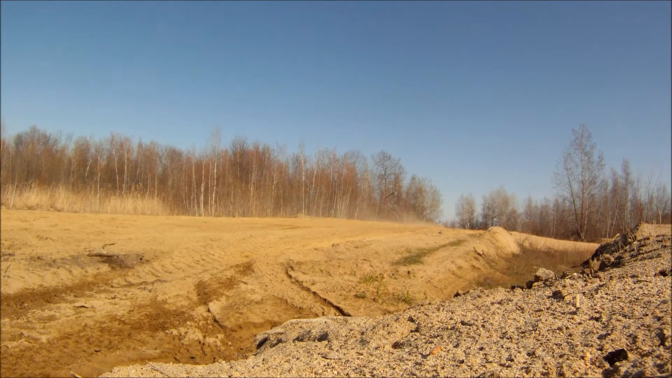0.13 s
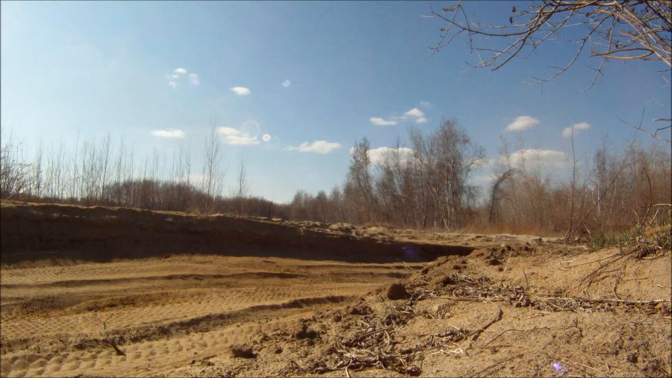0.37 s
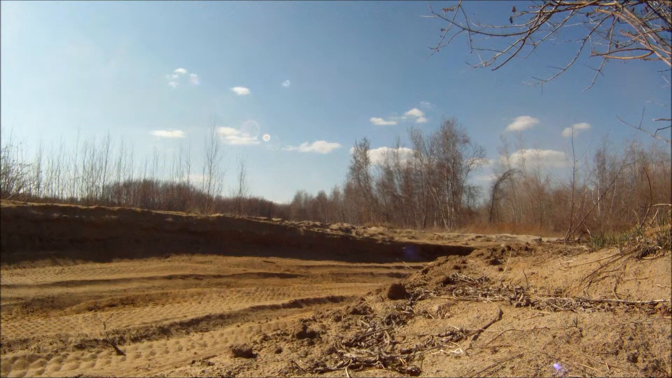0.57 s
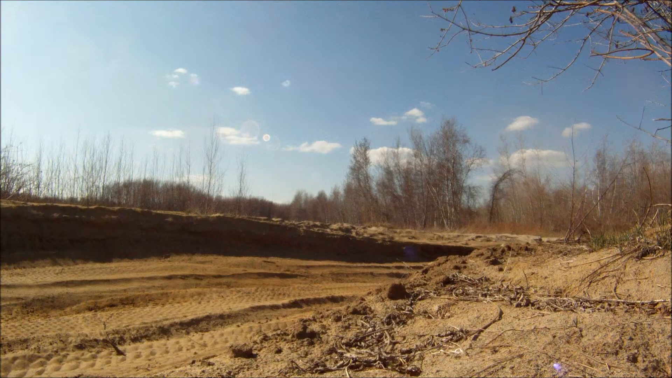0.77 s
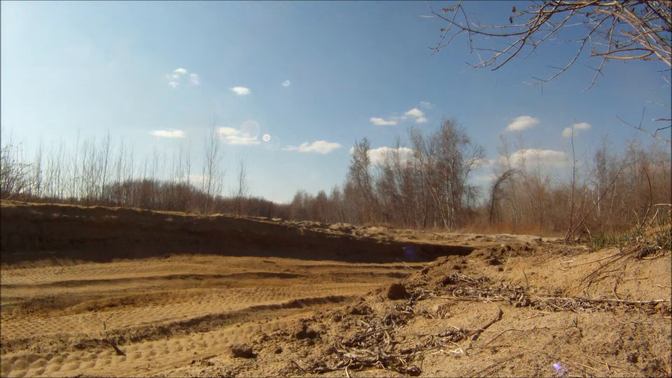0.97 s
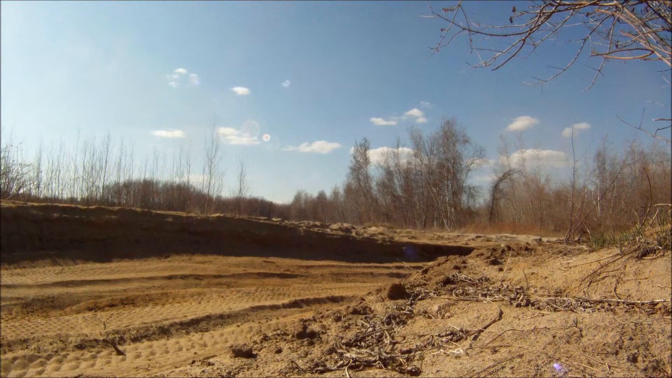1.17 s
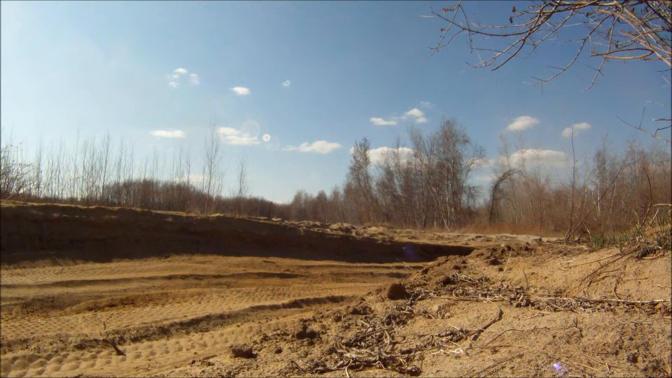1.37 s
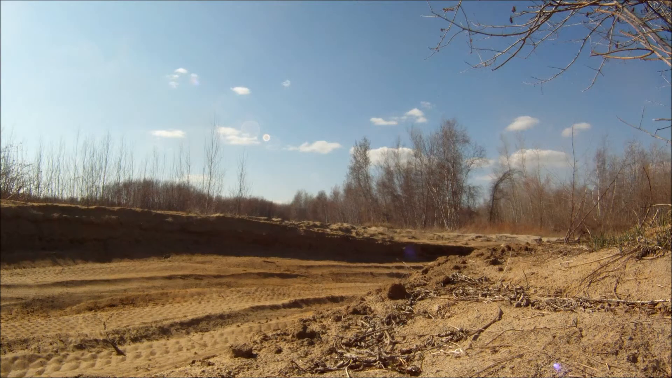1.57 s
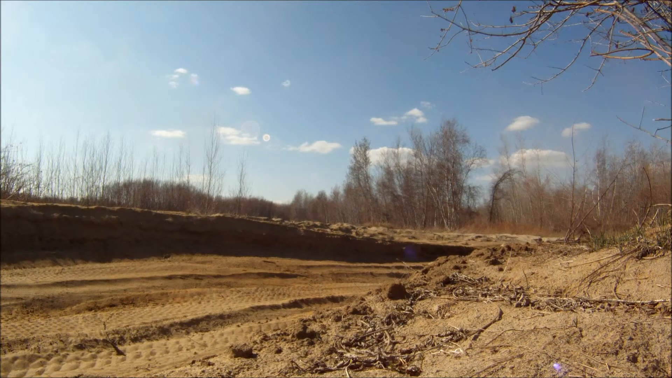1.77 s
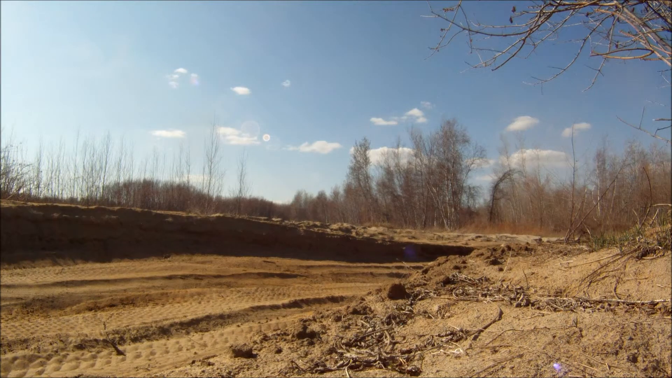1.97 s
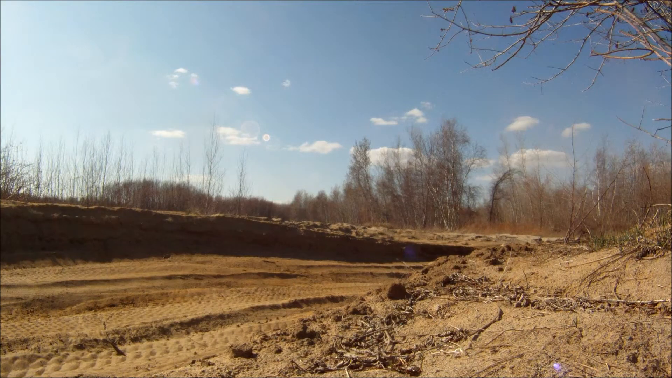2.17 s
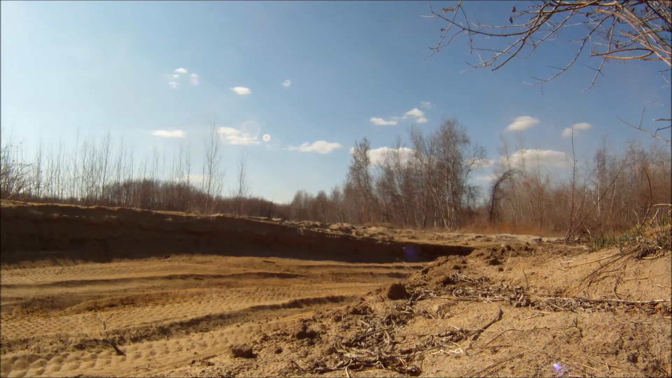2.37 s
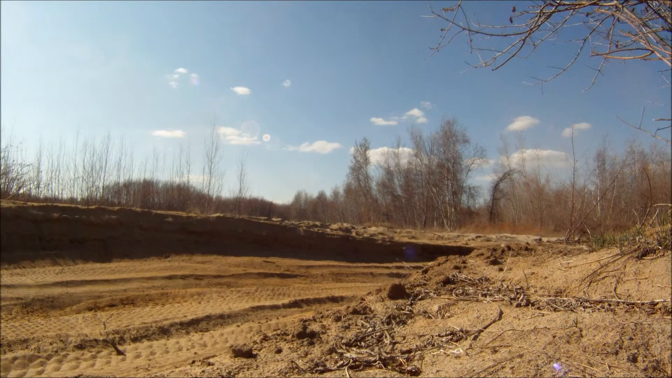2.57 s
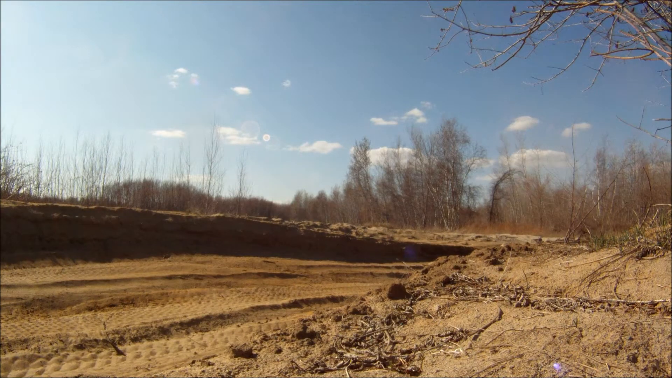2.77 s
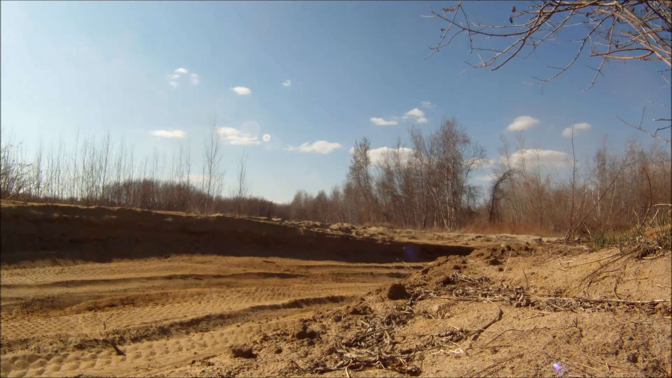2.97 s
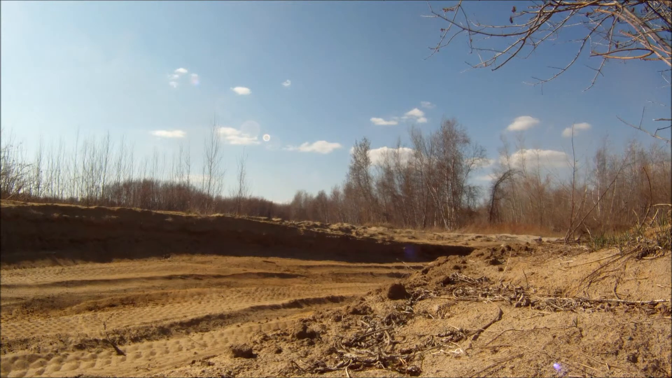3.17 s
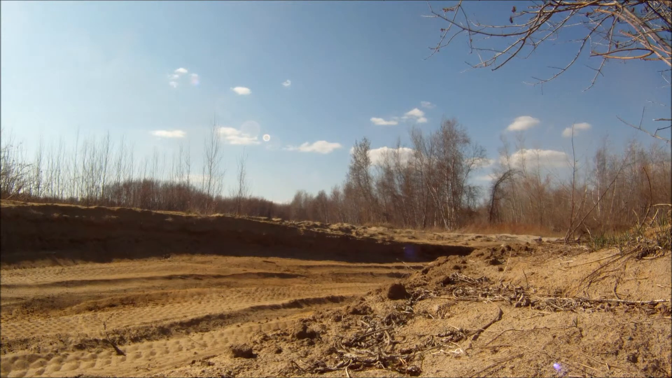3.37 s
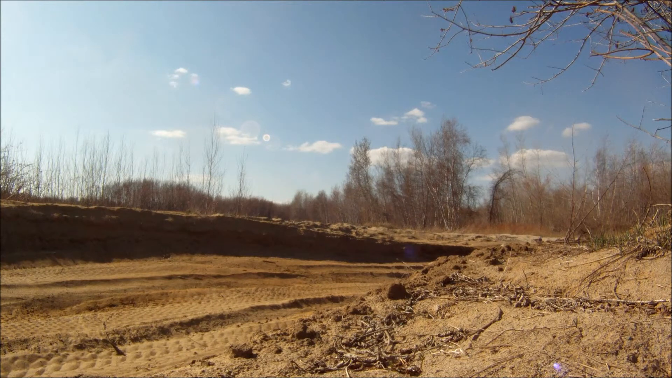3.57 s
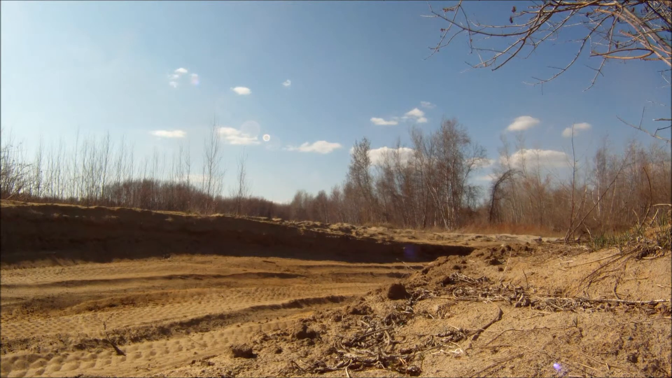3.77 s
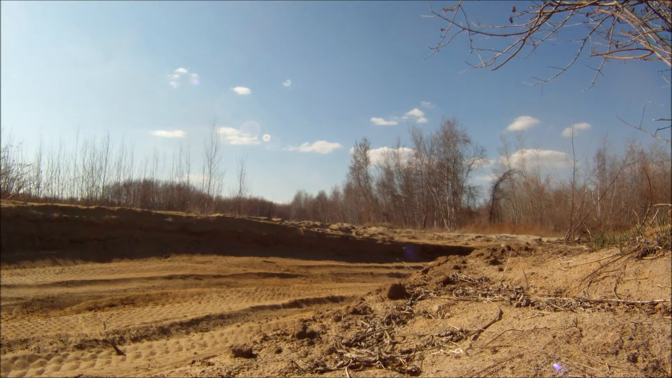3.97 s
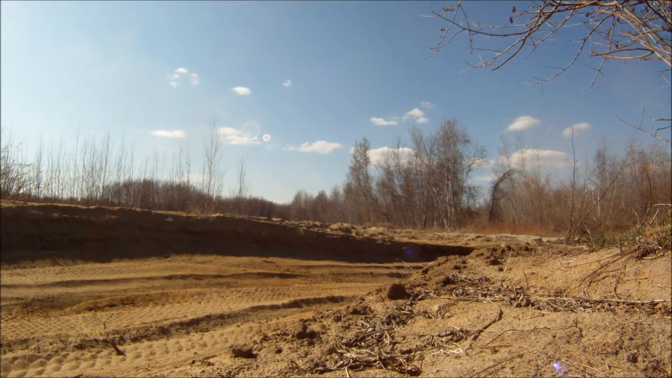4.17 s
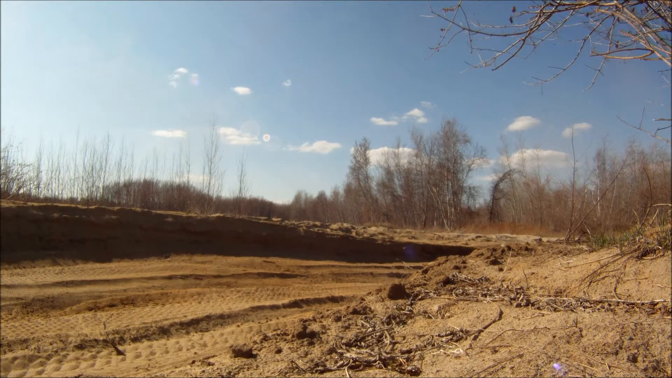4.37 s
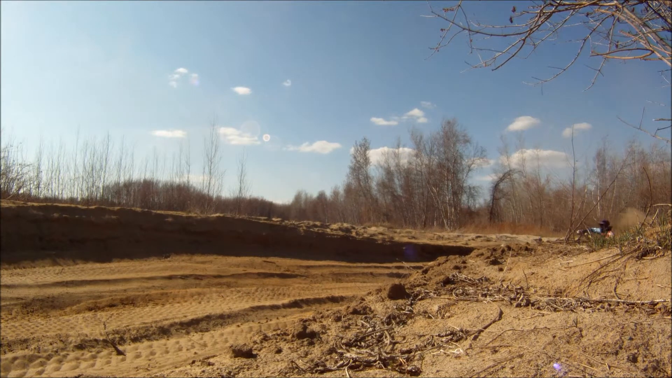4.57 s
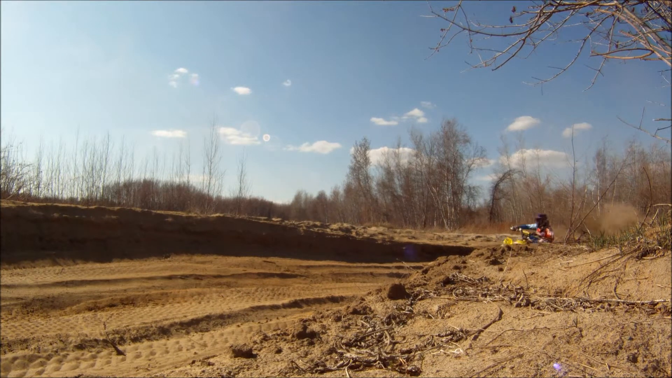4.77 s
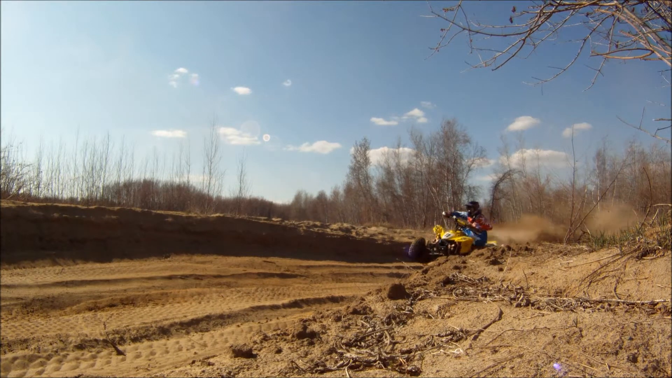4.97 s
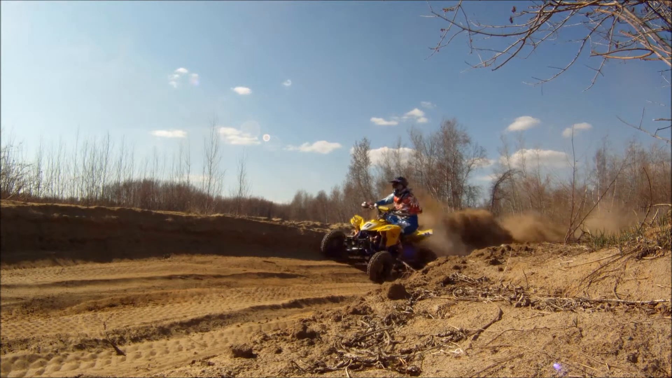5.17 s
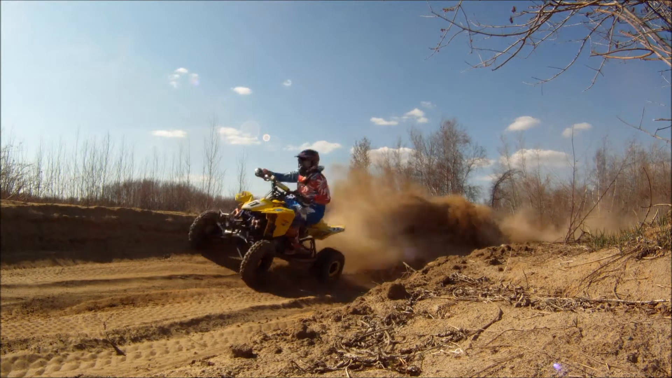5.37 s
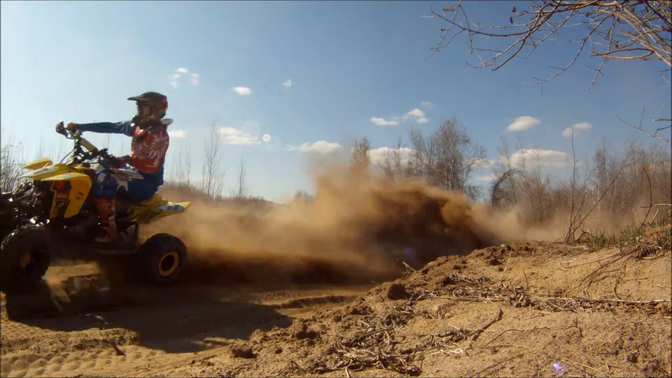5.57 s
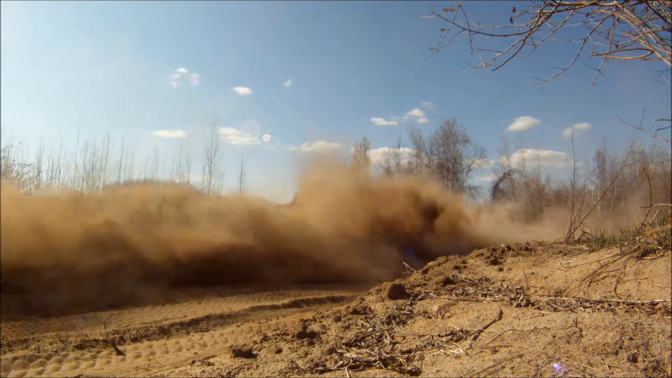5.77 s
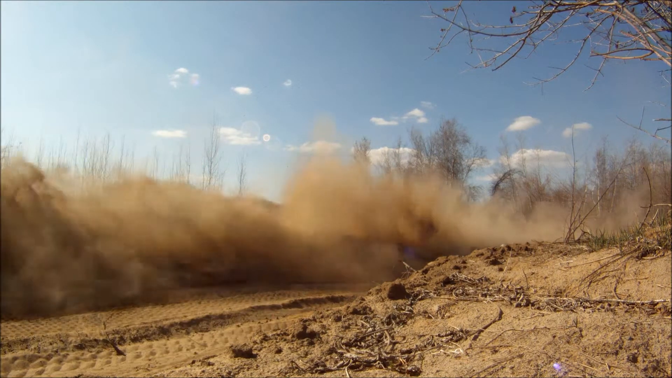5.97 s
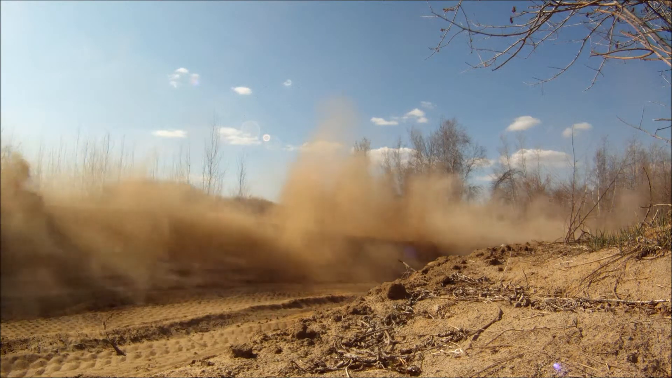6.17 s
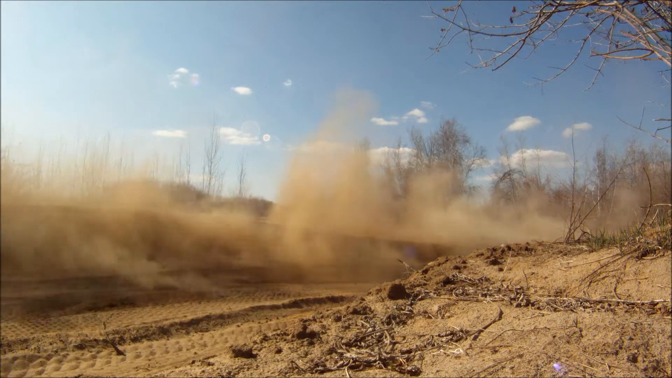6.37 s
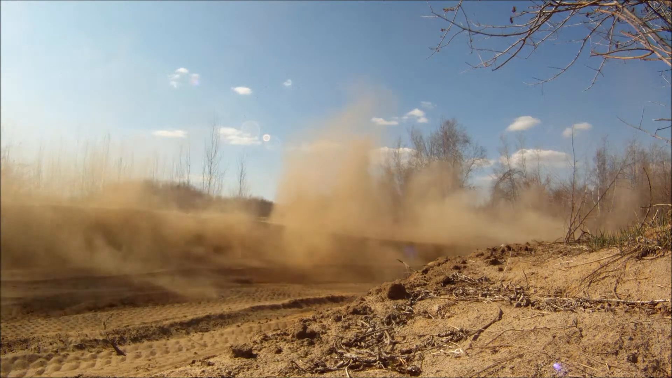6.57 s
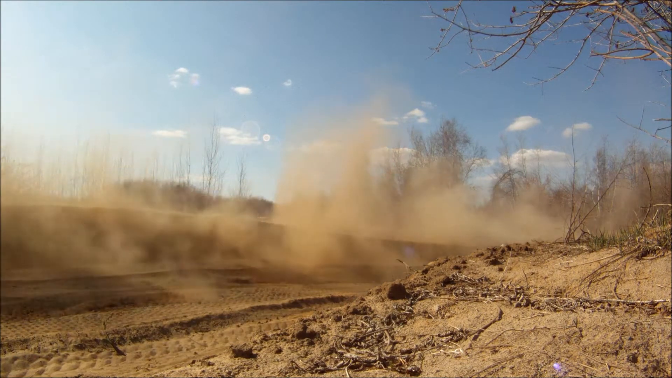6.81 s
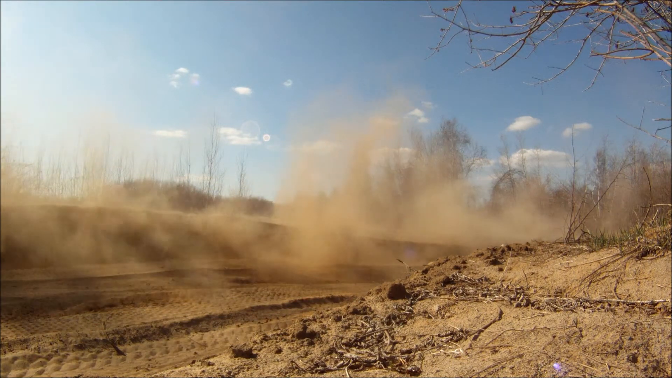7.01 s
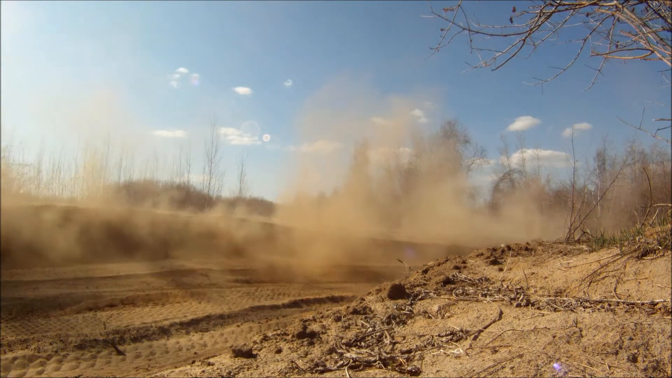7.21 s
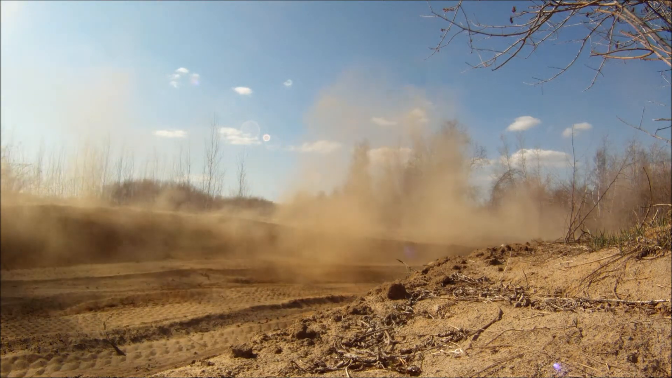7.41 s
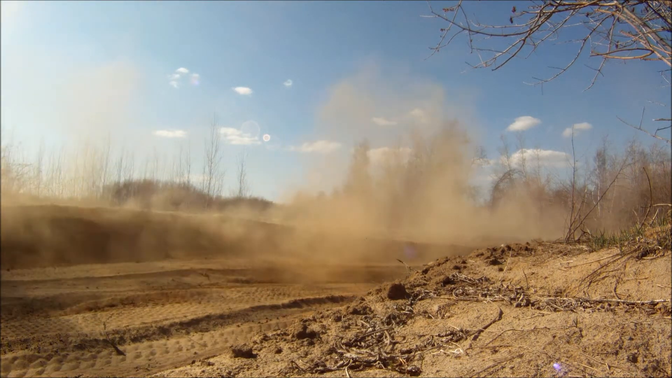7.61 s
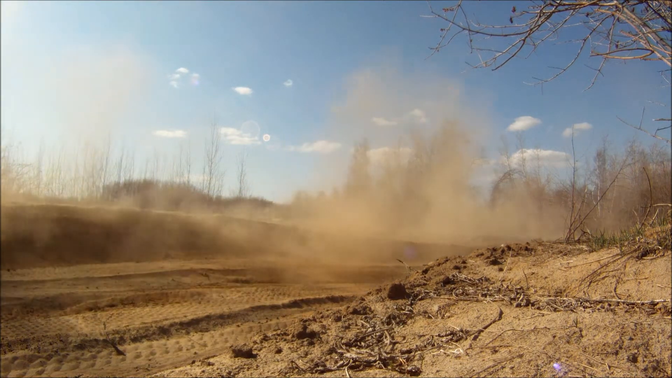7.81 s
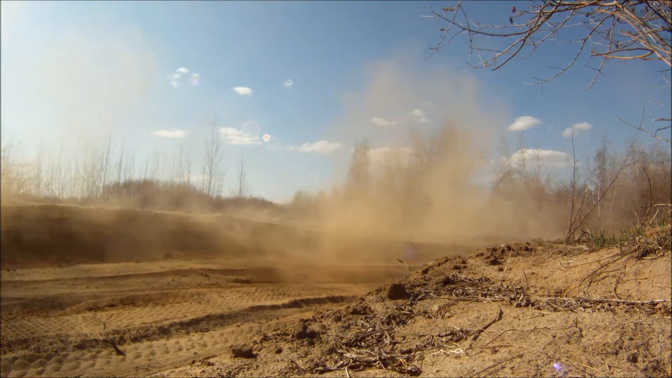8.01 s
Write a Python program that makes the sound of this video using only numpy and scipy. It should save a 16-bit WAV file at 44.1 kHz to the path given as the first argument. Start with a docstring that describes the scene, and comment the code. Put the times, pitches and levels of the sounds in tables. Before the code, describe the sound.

A quad bike's single-cylinder engine, close and dry with no audible room. From 0 to 0.28 s it coasts, muffled and falling in pitch; then it jumps abruptly louder and higher, with bright clatter and gas. Until 1.6 s the revs waver upward in uneven surges, then drop. A brief blip at 1.8 s gives way to a soft, slightly hunting low idle from about 2 to 3.3 s. Throttle blips at 3.4, 3.7 and 3.9 s bring back deep boom and growl. From 4.5 s it pulls steadily, brighter, with a nasal buzz near 5.5 s. Around 5.9 to 6.7 s it is wide open: a hard, crackling, hissing rasp dominates. At 6.85 s the sound cuts back briefly; at 6.93 s the next gear bites with a low thump, and pitch falls. It then lugs on, growling and uneven, nasal buzz returning until the end at 8 s.

```python
"""A single-cylinder four-stroke quad bike is ridden over sand, the microphone close by on the machine. The
sound jumps at .28 s to a louder, faster stretch; the rider then revs, coasts, idles, blips, pulls up to full
throttle and changes gear. Each firing sends one pulse down the pipe: harmonics of the firing rate, shaped by
the way of riding and by speed. Filtered noise adds a rumble, the clatter of valves and chain, a nasal buzz on
each firing, and a rasp of gas that is most of the treble with the throttle wide."""
import sys
import numpy as np
from scipy import signal
from scipy.fft import irfft
from scipy.io import wavfile

SR = 44100
rng = np.random.default_rng(int(sys.argv[2]) if len(sys.argv) > 2 else 0)


def bounce(signal):
    """Save signal as a 16-bit WAV file at the path given by the first command-line argument."""
    frames = np.transpose(np.atleast_2d(signal))
    limited = np.clip(frames, -1, 1)
    pcm = np.round(limited * 32767).astype(np.int16)
    wavfile.write(sys.argv[1], SR, pcm)


N = 354992
TIME = np.arange(N) / SR
STEP = 64  # samples between updates of the slow controls
SLOW_TIME = TIME[::STEP]
WAVER_DB, WAVER_PER_S = 0.79, 11  # boom, growl, bark and treble each waver a little


def gain_of(db):
    """Decibels to amplitude."""
    return 10 ** (np.asarray(db) / 20)


def evened(x):
    """Scales to rms 1."""
    return x / np.sqrt(np.mean(x ** 2) + 1e-20)


def curve(rows, t=TIME):
    """The second column of a table, joined by straight lines in time."""
    start_s, values = np.transpose(rows)
    return np.interp(t, start_s, values)


def coloured(x, points):
    """Minimum-phase filter with the given outline of freq_hz and level_db."""
    freq_hz, level_db = np.transpose(points)
    bins_hz = abs(np.fft.fftfreq(4096, 1 / SR)) + 1
    log_gain = np.log(gain_of(np.interp(np.log(bins_hz), np.log(freq_hz), level_db)))
    # the phase that goes with this outline in a causal filter
    taps = np.fft.ifft(np.exp(np.conj(signal.hilbert(log_gain)))).real
    return signal.oaconvolve(x, taps[:len(taps) // 2])[:N]


def random_glide(count):
    """One random value for each whole count, gliding from one to the next."""
    values = rng.standard_normal(1000)
    return np.interp(count, np.arange(len(values)), values)


# Engine speed before hunting and jitter: start_s, firing_hz (firings a second)
ENGINE_SPEED = [(0.0, 52.1), (0.16, 44.4), (0.27, 44.2), (0.29, 63.8), (0.57, 68.5), (0.71, 63.6),
                (0.93, 77.9), (1.03, 67.5), (1.14, 75.1), (1.24, 66.1), (1.3, 75.2), (1.4, 78.7),
                (1.46, 72.4), (1.56, 84.5), (1.62, 75.2), (1.64, 57.9), (1.76, 53.0), (1.79, 62.0),
                (1.84, 63.7), (1.89, 56.8), (1.99, 50.6), (2.29, 50.3), (2.42, 46.0), (2.48, 49.5),
                (2.63, 44.4), (2.68, 49.4), (2.87, 48.2), (3.38, 48.4), (3.44, 55.5), (3.54, 62.2),
                (3.65, 55.8), (3.74, 59.9), (3.85, 59.2), (3.93, 52.9), (4.09, 55.4), (4.18, 60.0),
                (4.27, 56.4), (4.38, 66.2), (4.48, 57.9), (4.6, 64.1), (4.78, 65.6), (4.99, 62.9),
                (5.14, 73.9), (5.19, 74.5), (5.29, 66.7), (5.46, 63.3), (5.55, 67.7), (5.8, 71.9),
                (5.94, 65.8), (6.19, 72.1), (6.27, 65.4), (6.44, 65.1), (6.53, 69.3), (6.73, 67.4),
                (6.77, 68.8), (6.83, 78.4), (6.93, 75.0), (6.98, 81.4), (7.01, 78.5), (7.05, 69.0),
                (7.18, 56.0), (7.36, 62.3), (7.46, 57.8), (7.55, 67.2), (7.66, 59.4), (7.69, 63.4),
                (7.76, 64.4), (7.83, 58.4), (8.04, 63.1)]


def firing_rate(t=TIME):
    """Firings a second; a four-stroke single fires once in two turns of the crank."""
    return curve(ENGINE_SPEED, t)


# Harmonic outline of the exhaust pulse for each way of riding, before the boom, growl and bark are set:
# order (multiple of the firing rate), level_db
COAST = [(1, -8.5), (2, -9), (3, 3.5), (4, -5.5), (5, -18), (6, -23.5), (7, -17.5), (8, -20.5), (9, -45.5),
         (10, -28), (11, -34), (12, -34), (14, -46.5), (17, -54), (20, -53), (24, -52)]
IDLE = [(1, -4.5), (2, 3), (3, -11), (4, -8.5), (5, -9), (6, -15.5), (7, -21.5), (8, -19.5), (9, -17.5),
        (10, -22), (11, -52), (12, -27), (14, -36), (17, -58), (20, -45), (24, -47)]
CRUISE = [(1, -9.5), (2, 9.5), (3, 0.5), (4, -5.5), (5, -15.5), (6, -22), (7, -25.5), (8, -29.5),
          (9, -21.5), (10, -57), (11, -35), (12, -59), (14, -49), (17, -34), (20, -51), (24, -54)]
PULL = [(1, 11), (2, 18), (3, 14.5), (4, 3.5), (5, -2), (6, -4.5), (7, -56.5), (8, -11), (9, -22),
        (10, -21.5), (11, -24), (12, -20.5), (14, -26.5), (17, -37.5), (20, -48), (24, -56)]
CHARGE = [(1, 10), (2, 25), (3, 13.5), (4, 16.5), (5, 10.5), (6, -3), (7, 3), (8, -13), (9, -3.5), (10, -4),
          (11, -13), (12, -9), (14, -12.5), (17, -23), (20, -24), (24, -30)]
BUILD = [(1, -22.5), (2, 1), (3, 5), (4, 1), (5, 2), (6, -16), (7, -10), (8, -14.5), (9, -14.5),
         (10, -25.5), (11, -14.5), (12, -19), (14, -14.5), (17, -25.5), (20, -31), (24, -37)]
FLAT_OUT = [(1, -6), (2, 4.5), (3, 2.5), (4, 3.5), (5, 3.5), (6, -4), (7, 4), (8, 1.5), (9, -2), (10, -6),
            (11, -11.5), (12, -14), (14, -15), (17, -42), (20, -23), (24, -29)]
LUG = [(1, 2), (2, 11), (3, 11.5), (4, 4), (5, 9.5), (6, 8.5), (7, 1.5), (8, 0), (9, -4.5), (10, -5.5),
       (11, -11), (12, -14), (14, -17), (17, -37), (20, -47), (24, -39)]
# Settings over time: a sudden jump at .28 s, then moves of the throttle; levels are those before speed and
# waver bend them: start_s (middle of the change), change_s, pulse, boom_db, growl_db, bark_db, ringing (of the
# pipe, 0-1), uneven_db (from firing to firing)
RIDE = [ (0, .01, COAST, -31, -34, -47.5, 0.46, .5), (.28, .02, CRUISE, -23, -34.5, -49.5, 0.72, 1),
        (1, 0.87, CRUISE, -24.5, -31.5, -43.5, 0.8, 2), (1.613, 0.017, COAST, -32, -41, -53.5, 0.9, 2),
        (1.772, .02, PULL, -29, -36.5, -48.5, 1, 2), (1.85, 0.023, COAST, -32, -40, -50, 0.81, 1.7),
        (2.641, 0.014, IDLE, -33.5, -43, -51, 0.9, 2), (3.1, 0.27, IDLE, -31.5, -36.5, -43.5, 1, 1.5),
        (3.385, .088, PULL, -22.5, -30, -43.5, 1, 1.2), (3.59, 0.072, IDLE, -28.5, -38, -45, 1, 2),
        (3.67, .05, PULL, -22, -26, -44, 1, 2), (3.805, 0.061, IDLE, -26.5, -39, -42, 1, 0.6),
        (3.92, 0.058, PULL, -22, -24.5, -42.5, 0.97, 1.58), (4.4, 0.057, PULL, -21.5, -26, -38, 1, 1.94),
        (4.56, 0.082, BUILD, -21, -26.5, -39.5, 0.88, 0.67), (5.15, 0.41, BUILD, -22, -26, -36.5, 1, 0.86),
        (5.5, 0.17, CHARGE, -23, -25, -35.5, 1, 0.9), (5.87, .16, FLAT_OUT, -26.5, -29.5, -35.5, .08, .85),
        (6.839, 0.023, FLAT_OUT, -34, -41, -47, 0.2, 3.5), (6.925, .02, LUG, -27.7, -27.3, -30, .58, .9), ]


def ridden(t, settings):
    """Glides from one setting to the next, one for each row of RIDE."""
    state = settings[0]
    for (start_s, change_s, *_), goal in zip(RIDE[1:], settings[1:]):
        progress = np.clip((t - start_s) / change_s + .5, 0, 1)
        state = state + progress * (goal - state)
    return state


WIDE_S = 5.85  # middle of the change as the throttle reaches its stop


def wide_open(t, change_s=0.34):
    """Goes from 0 to 1 as the throttle reaches its stop."""
    return np.clip((t - WIDE_S) / change_s + .5, 0, 1)


# Bend per octave of engine speed above MID_RATE (firings a second)
MID_RATE = 60
BOOM_DB_PER_OCTAVE, GROWL_DB_PER_OCTAVE, BARK_DB_PER_OCTAVE = -3, 11.5, -1
BARK_SHARE, MID_TREBLE_DB = .45, -50  # dB of bark for each dB of treble above the middle level
SHIFT_S, THUMP_RISE_S, THUMP_BOOM_DB, THUMP_GROWL_DB = 6.925, 0.011, 10, 4  # the next gear bites


def effort():
    """Boom, growl and bark of the pipe in dB: way of riding, engine speed and thump of the gear change."""
    t = SLOW_TIME
    boom, growl, bark = ridden(t, [np.vstack(row[3:6]) for row in RIDE])
    octaves = np.log2(firing_rate(t) / MID_RATE)
    age = np.maximum(t - SHIFT_S, 0) / THUMP_RISE_S
    thump = age * np.exp(1 - age)
    boom = boom + BOOM_DB_PER_OCTAVE * octaves + THUMP_BOOM_DB * thump
    growl = growl + GROWL_DB_PER_OCTAVE * octaves + THUMP_GROWL_DB * thump
    # the bark swells with the treble
    bark = bark + BARK_DB_PER_OCTAVE * octaves + BARK_SHARE * (curve(TREBLE, t) - MID_TREBLE_DB)
    return [db + WAVER_DB * random_glide(WAVER_PER_S * t) for db in (boom, growl, bark)]


# Outline of the rumble noise: freq_hz, level_db (relative)
RUMBLE = [(25, -10), (55, -4), (130, -23), (300, -1.5), (500, -1), (800, -12), (1300, -24.5), (3000, -66)]


def rumble(firings, levels, throb=0.059, below_boom_db=25, below_growl_db=23):
    """Turbulent gas and the shaking frame: noise between the orders, throbbing once a firing."""
    boom, growl, _ = (np.interp(TIME, SLOW_TIME, db) for db in levels)
    churn = rng.standard_normal(N) * (1 + throb * np.cos(2 * np.pi * firings))
    size = np.hypot(gain_of(boom - below_boom_db), gain_of(growl - below_growl_db))
    return size * evened(coloured(churn, RUMBLE))


# Outline of the clatter of the casings: freq_hz, level_db (relative)
CLATTER = [(500, -18.5), (1050, -13.5), (1400, -4.5), (2200, -5), (3000, 2.5), (3550, -3), (4000, -1),
           (4800, -12.5), (6000, -23), (7200, -16), (8100, -8), (9200, -8), (10700, -21.5), (13400, -16),
           (15000, -14)]


def clatter(firings, throb=0.028, grain_db=2.0, ticks_per_s=1500, tick_share=0.75):
    """Dense small ticks of valves and chain, over a hiss, swelling with each turn of the crank."""
    loudness = gain_of(grain_db * np.minimum(rng.exponential(1, N), 4))
    struck = rng.random(N) < ticks_per_s / SR
    ticks = rng.standard_normal(N) * loudness * struck
    hiss = rng.standard_normal(N)
    swell = 1 + throb * np.cos(2 * np.pi * 2 * firings)  # two turns to a firing
    return evened(coloured((tick_share * evened(ticks) + hiss) * swell, CLATTER))


def gas_bursts(firings, colour, lead_s, length_s, tail, alike, uneven_db):
    """A burst of rushing gas with each pulse; part of it repeats from one firing to the next."""
    rate = firing_rate()
    age = (firings + lead_s * rate) % 1 / rate  # seconds since the burst began
    onset = (1 - np.exp(-age / 0.00016)) ** 2
    gate = onset * (np.exp(-(age / length_s) ** 2) + tail * np.exp(-age / 0.0068))
    scatter = irfft(np.exp(2j * np.pi * rng.random(129)))
    grain = scatter[(age * SR).astype(int) % len(scatter)]
    repeated = evened(signal.lfilter([1], [1, -.5], grain))  # tilted to the lower part
    fresh = rng.standard_normal(N)
    gas = gate * (np.sqrt(alike) * repeated + np.sqrt(1 - alike) * fresh)
    return evened(coloured(gas * gain_of(uneven_db * random_glide(firings)), colour))


# Level of the nasal buzz: start_s, level_db
BUZZ = [(.25, -90), (.35, -69), (.9, -69), (1.3, -82), (1.95, -68), (2.55, -69), (2.7, -81), (4.6, -72),
        (5.45, -50), (5.9, -53), (6.3, -72), (7.3, -78), (7.6, -54), (7.8, -43.5), (8.05, -46)]


def buzz(firings, buzz_hz=1500, width_hz=560):
    """A nasal buzz near one resonance, struck by each firing; strongest near 5.5 s and at the end."""
    colour = [(buzz_hz - 2 * min(width_hz, buzz_hz / 3), -40),
              (buzz_hz - width_hz / 2, -2), (buzz_hz, 0), (buzz_hz + width_hz / 2, -3),
              (buzz_hz + 2 * width_hz, -25), (SR / 2, -70)]
    bursts = gas_bursts(firings, colour, lead_s=0.00094, length_s=0.0054, tail=0.9, alike=0.7, uneven_db=-3.0)
    return gain_of(curve(BUZZ)) * bursts


# Outlines of the gas rasp, throttle opening and throttle wide: freq_hz, level_db (relative)
RASP_RISING = [(500, -10.5), (900, 0), (1300, -5.5), (1750, -3.5), (2250, 3.5), (3300, -7.5), (4000, -7.5),
               (6000, -27), (7800, -11), (8900, -15), (9700, -5.5), (10600, -15), (13600, -10),
               (14500, -18.5)]
RASP_WIDE = [(1100, -17), (1450, -0.5), (2500, 1.5), (3000, 4.5), (3700, -9), (4100, -4), (4900, -17),
             (5400, -10.5), (6000, -20.5), (7900, -11.5), (9100, -4.5), (11000, -19), (13200, -19),
             (15000, -8.5)]


def rasp(firings):
    """Gas rushing on each pulse: a long, smooth buzz as the throttle opens, a short, hard crackle once wide."""
    rising = gas_bursts(firings, RASP_RISING, lead_s=.0008, length_s=0.0041, tail=1.0, alike=0.61, uneven_db=1.0)
    wide = gas_bursts(firings, RASP_WIDE, lead_s=0.001332, length_s=0.0023, tail=0.2, alike=0.3, uneven_db=1.45)
    blend = wide_open(TIME)
    return np.sqrt(1 - blend) * rising + np.sqrt(blend) * wide


PIPE_HOLD = 0.14  # 0: the peaks of a pulse glide with engine speed; 1: they stay at the pipe's own pitches


def riding(t, orders, fall_db=3.5):
    """Pulse spectrum, ringing and unevenness over time, as the way of riding changes."""
    rate = firing_rate(t)
    ends = [row[0] for row in RIDE[1:]] + [t[-1]]
    spectra = []
    for (start_s, _, pulse, *_), end_s in zip(RIDE, ends):
        order, level_db = np.transpose(pulse)
        mean_rate = rate[(t >= start_s) & (t <= end_s)].mean()
        place = orders[:, None] * (rate / mean_rate) ** PIPE_HOLD
        beyond = np.maximum(place - order[-1], 0)  # past the last order of the table
        spectra.append(np.interp(place, order, level_db) - fall_db * beyond)
    ringing, uneven_db = ridden(t, [np.vstack(row[6:]) for row in RIDE])
    return ridden(t, spectra), np.clip(ringing, 0, 1), uneven_db


MUFFLER_HZ, MUFFLER_DB_PER_OCTAVE = 760, 30  # with the throttle wide, the pulse falls off above this pitch


def exhaust(firings, levels, boom_top_hz=195, growl_top_hz=400, count=26):
    """One pulse a firing: a quick suck and push, drawn out by the ringing of the pipe."""
    t, orders = SLOW_TIME, np.arange(1, count + 1)
    db, ringing, uneven_db = riding(t, orders)
    boom, growl, bark = levels
    hz = orders[:, None] * firing_rate(t)
    db = db - wide_open(t) * MUFFLER_DB_PER_OCTAVE * np.log2(np.maximum(hz / MUFFLER_HZ, 1))
    low, below_bark = (1 / (1 + (hz / top) ** 16) for top in (boom_top_hz, growl_top_hz))
    # effort sets the low orders (boom), the middle ones (growl) and the high ones (bark);
    # the bands overlap, so they are levelled twice
    for share, level in [(low, boom), (below_bark - low, growl), (1 - below_bark, bark)] * 2:
        power = (share * gain_of(db) ** 2).sum(0) / 2
        db = db + share * (level - 10 * np.log10(power))
    # a resonant pipe delays each order according to the slope of its spectrum
    log_gain = np.log(gain_of(np.vstack([db[:1] - 13.0, db, db[-2::-1]])))
    lag = -np.pi / 2 - ringing * signal.hilbert(log_gain, axis=0).imag[1:count + 1]
    uneven_db = np.interp(TIME, t, uneven_db)
    out = np.zeros(N)
    for order, size, phase in zip(orders, gain_of(db), lag):
        # no two burns have quite the same shape
        wobble = gain_of(uneven_db * np.sqrt(order / 2) * random_glide(firings))
        angle = 2 * np.pi * order * firings + np.interp(TIME, t, phase)
        out += wobble * np.interp(TIME, t, size) * np.cos(angle)
    return out * gain_of(uneven_db / 2 * random_glide(firings))


# At low revs the engine speed hunts, fully so HUNT_RANGE_HZ under HUNT_BELOW_HZ
HUNT_HZ, HUNT_PER_S, HUNT_BELOW_HZ, HUNT_RANGE_HZ = .45, 22, 54, 5.01
# Share of the treble's power that is gas rasp, the rest being clatter: start_s, share (0-1)
RASP_SHARE = [(0, 0.23), (4.4, 0), (4.9, 0.5), (5.3, 0.79), (5.8, 0.93), (6.2, 0.98), (6.75, 0.94),
              (6.88, 0.16), (6.95, 0.8), (7.2, 0.42), (7.6, 0.28), (7.9, 0.74)]
# Level of the treble, rasp and clatter together, before its waver: start_s, level_db
TREBLE = [(0.0, -65), (0.04, -65.5), (0.27, -69.5), (0.29, -52.5), (1.59, -46), (1.95, -58), (2.91, -67),
          (3.34, -64), (3.47, -49.5), (3.88, -55), (4.44, -45), (4.64, -51), (5.4, -38), (5.6, -37.5),
          (6.19, -30), (6.64, -31), (6.9, -47), (6.95, -39.5), (7.02, -46.5), (7.62, -43.5), (7.76, -41.5),
          (8.05, -42.5)]


def scene(jitter=0.002, first_phase=.33):
    """All layers follow one running count of firings; jitter and first_phase are in firings."""
    rate = firing_rate()
    low_revs = np.clip((HUNT_BELOW_HZ - rate) / HUNT_RANGE_HZ, 0, 1)
    hunting = HUNT_HZ * low_revs * random_glide(HUNT_PER_S * TIME)
    firings = first_phase + np.cumsum(rate + hunting) / SR
    firings = firings + jitter * random_glide(firings)
    levels = effort()
    share = np.clip(curve(RASP_SHARE), 0, 1)
    treble = np.sqrt(share) * rasp(firings) + np.sqrt(1 - share) * clatter(firings)
    treble_db = curve(TREBLE) + WAVER_DB * random_glide(WAVER_PER_S * TIME)
    mix = rumble(firings, levels) + gain_of(treble_db) * treble + buzz(firings) + exhaust(firings, levels)
    return mix[None]


# Gain of the copies on either side of the high tone, by the pitch they come from: freq_hz, gain_db
SIZZLE = [(30, -57), (65, -43), (130, -37.5), (230, -36), (400, -28.5), (650, -25), (1000, -21),
          (1500, -52), (3000, -96)]
SIZZLE_HZ, EDGE_HZ = 12000, 15750  # the high tone; the top of the recorder's band


def record(dry):
    """The recorder mirrors the lower sound around a high tone, a thin sizzle; then the band limit."""
    sizzle = coloured(dry[0], SIZZLE) * 2 * np.cos(2 * np.pi * SIZZLE_HZ * TIME)
    band_limit = signal.firwin(511, EDGE_HZ, window=("kaiser", 9), fs=SR)
    return signal.oaconvolve(dry + sizzle, band_limit[None], "same")


dry = scene()
out = record(dry)
bounce(out)
```